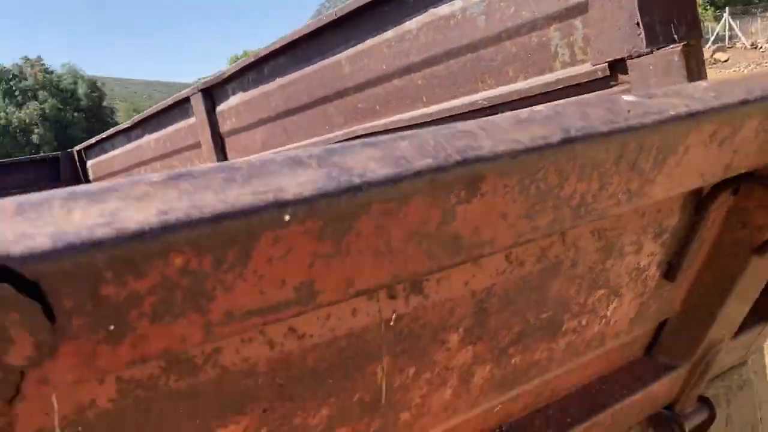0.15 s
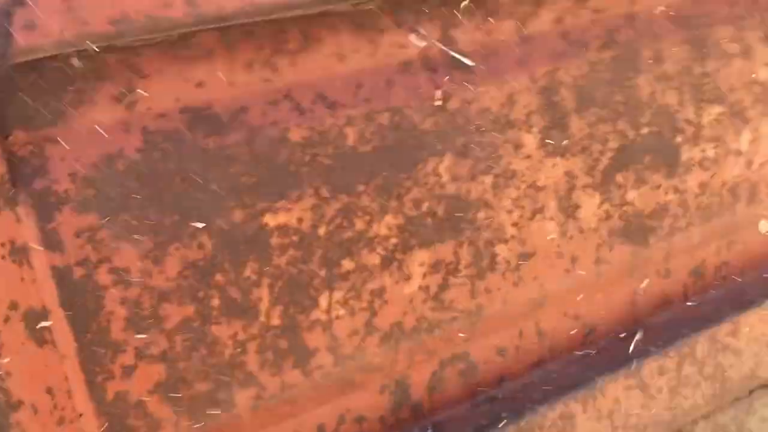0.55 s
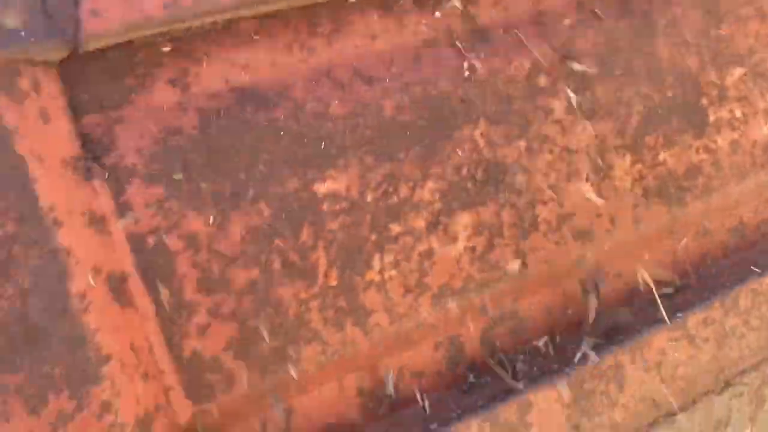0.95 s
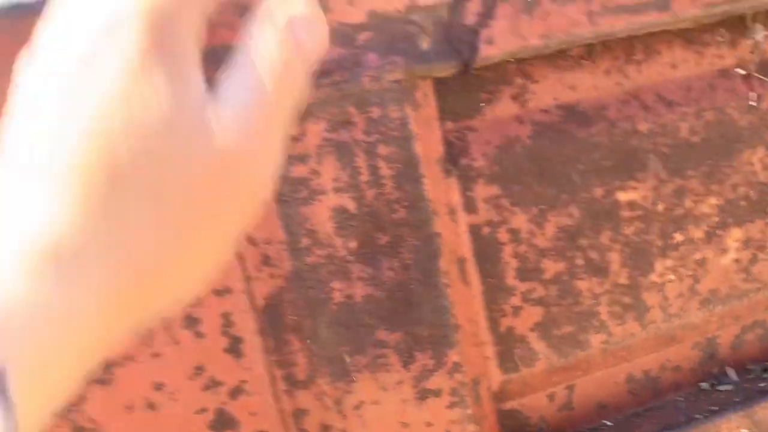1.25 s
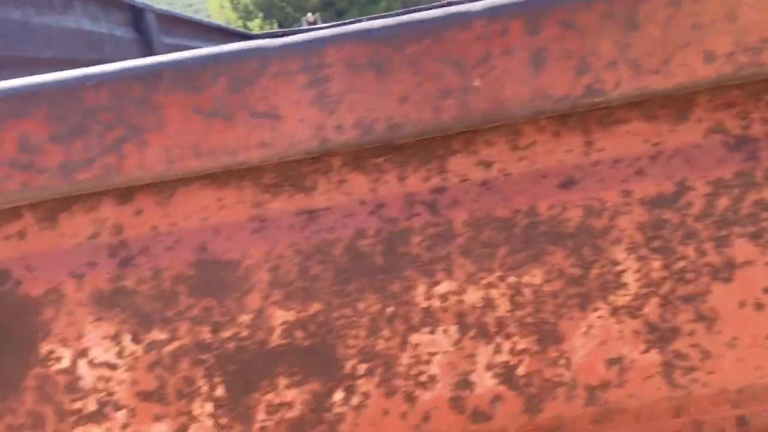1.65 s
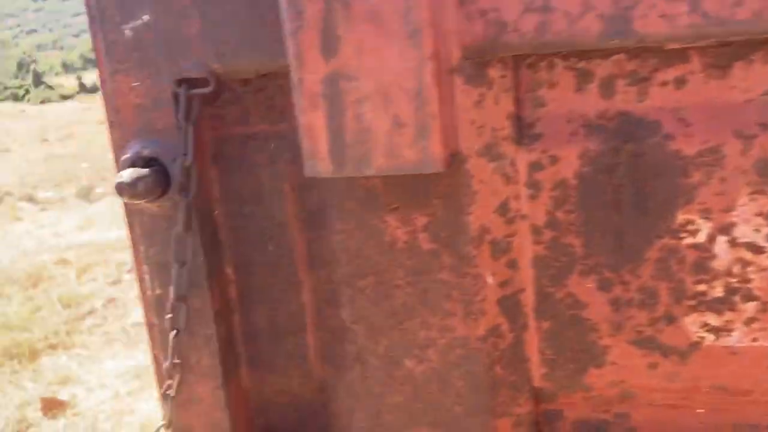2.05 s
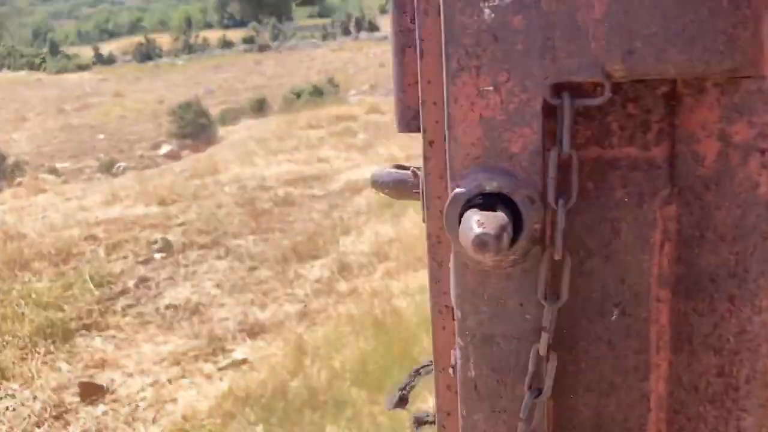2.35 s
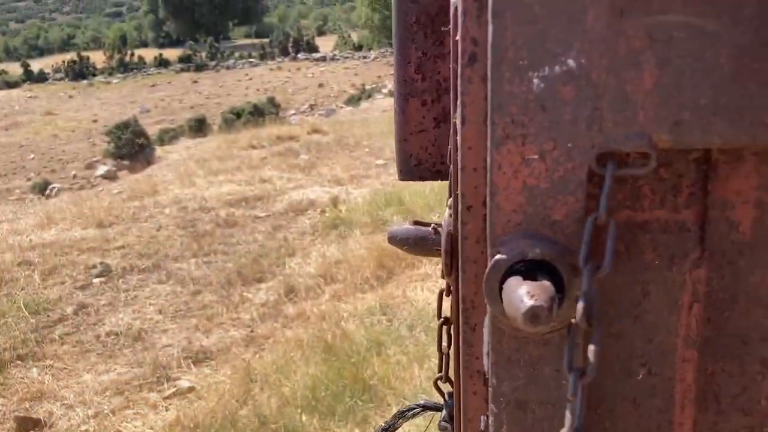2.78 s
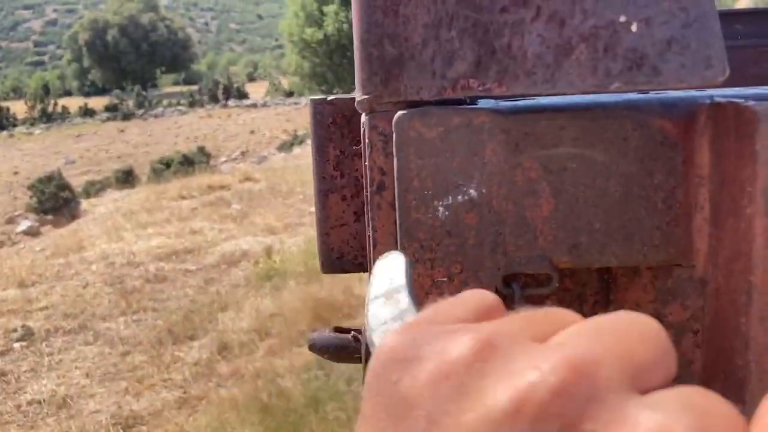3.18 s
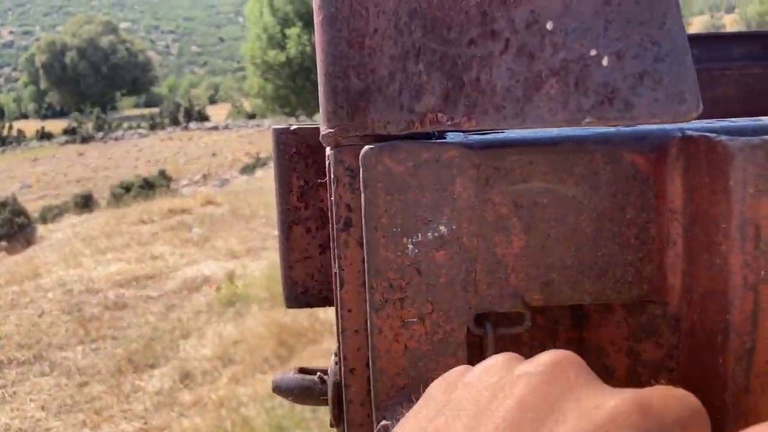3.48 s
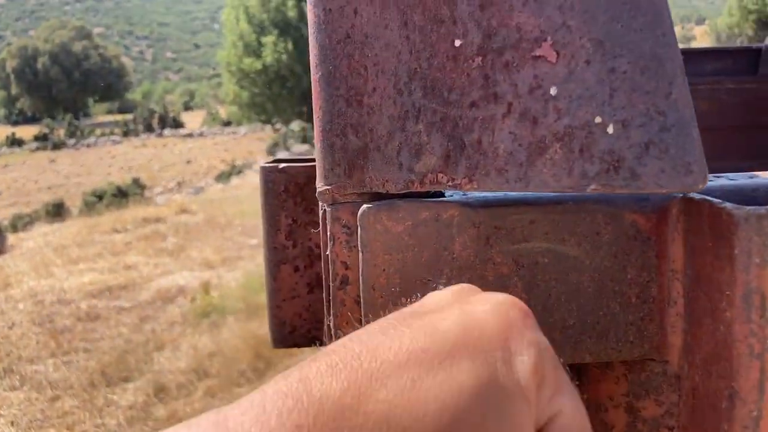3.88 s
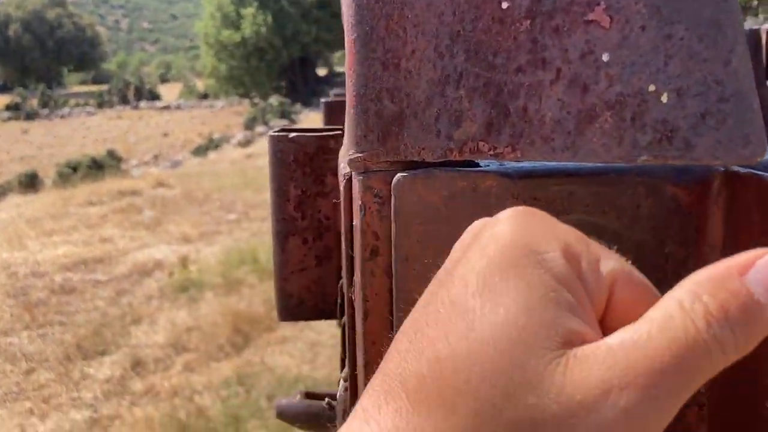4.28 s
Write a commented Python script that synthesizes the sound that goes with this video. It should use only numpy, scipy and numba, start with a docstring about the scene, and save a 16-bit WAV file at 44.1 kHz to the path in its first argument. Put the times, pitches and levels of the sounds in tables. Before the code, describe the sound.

Close, stereo phone pickup outdoors, no room echo. Throughout, a three-cylinder diesel idles at about sixteen soft, deep thumps a second, with slight exhaust resonance over a faint low wash; it eases a little after 2 s. From 0 to 0.5 s a loose steel gate rumbles with light clinks, gritty scraping and a dull thud at 0.27. At 0.55-0.7 it slams: the loudest, dense, clanging sheet-metal crash with low boom and spraying rust grit. Until about 1.25 clattering knocks and rattles follow, peaking near 0.92 and 1.08, over a wavering low hum of the sheet that fades by 2.1. A hard bright clank hits at 1.63. Crisp chain and pin clinks come around 2.0, 2.26 and 2.33, a finger tick on the phone at 2.17, then tiny high tinkles at 2.8-2.97. A ringing latch clack falls at 3.5, another phone tick at 3.94, a last small clink at 4.09.

```python
"""Outdoors behind a steel trailer, near a hand-held phone: a three-cylinder diesel idles, each firing
a thump that rings exhaust and block, over a distant noise wash.
The tailgate rumbles, slams shut and sheds grit: blows and shaped noise ring its sheet modes.
Latch, chain and pin clink as struck steel modes plus rattling noise; the sheet hums on one slow mode.
A finger knocks twice on the phone: ticks that fall in pitch."""
import sys
import numpy as np
from scipy import signal
from scipy.fft import rfft, irfft
from scipy.io import wavfile
from scipy.ndimage import uniform_filter1d
from numba import njit

SR = 44100
rng = np.random.default_rng(int(sys.argv[2]) if len(sys.argv) > 2 else 0)


def undo_db(level):
    """Turn decibels back into plain size, where 20 dB means ten times bigger."""
    steps = np.asarray(level, float) / 20
    return 10 ** steps


def wrap_up_sound(samples):
    """Save the sound to the file named by the first command line argument, as 16-bit audio."""
    columns = np.atleast_2d(samples).T
    # keep every value between -1 and 1, then stretch to whole-number steps
    tamed = np.clip(columns, -1, 1)
    steps = np.round(tamed * 32767).astype(np.int16)
    wavfile.write(sys.argv[1], SR, steps)


N = 194948
T = np.arange(N) / SR

# gate sheet modes: (frequency [Hz], relative level [dB], t60 [s])
GATE_MODES = [(110, -2, .15), (160, -3, .12), (210, 0, .15), (285, 2, .15), (307, 0, .7), (369, 2, .22),
              (410, -4, .35), (486, -2, .22), (576, -6, .4), (635, -6, .25), (727, -2, .12), (788, 0, .18),
              (838, 2, .15), (885, 0, .12), (940, 0, .18), (996, 0, .2), (1098, 0, .1), (1168, 0, .1),
              (1240, 0, .11), (1320, -2, .1), (1400, -2, .08), (1663, -1, .3), (1860, -3, .22),
              (1950, -2, .14), (2090, -2, .08), (2290, 0, .08), (2430, -4, .05), (2630, -7, .06),
              (2980, -11, .04), (3300, -12, .04), (3600, -12, .04)]
# blows on the gate sheet: (time [s], relative level [dB], loudest ring [Hz])
SHEET_BLOWS = [(.002, -34, 790), (.2, -24, 490), (0.269, -6, 170), (.539, -25, 2290), (0.553, -19, 1100),
               (0.556, -15.5, 369), (0.579, -14, 310), (0.597, -13.5, 277.5), (0.58, -14, 1137),
               (.584, -10, 3300), (.597, -10.5, 2090), (.612, -15.5, 1800), (0.679, -24, 2430),
               (0.611, -11, 380), (.63, -20, 720), (0.597, -13, 110), (.6, -17, 1210), (.76, -28, 310),
               (0.95, -27, 1240), (1.0, -33.5, 410), (1.169, -28, 1990), (1.199, -44, 560),
               (1.633, -14.5, 824), (1.641, -13, 940), (1.632, -11, 2400), (1.632, -13.5, 2980),
               (1.644, -21.5, 1950), (1.678, -15.5, 3600), (1.636, -18, 1250), (1.635, -22, 1663),
               (1.636, -30, 380), (1.75, -43, 1860), (1.69, -30, 960), (1.175, -30, 1168), (.97, -30, 410),
               (2.052, -40, 860), (2.053, -40, 1240), (2.065, -44, 390), (2.335, -37, 1200),
               (3.498, -42, 1784), (3.499, -42, 1200), (4.092, -37, 1330)]
# steel on steel: (time [s], relative level [dB], loudest ring [Hz], ring over blow [dB],
# nominal rattle t60 [s])
CLINKS = [(0.1036, -34.5, 7260, -18, 0.13), (0.173, -23, 7700, -11, 0.098),
          (0.2442, -40.5, 3360, -29, 0.032), (0.264, -36.5, 3620, -8, 0.17),
          (0.418, -30.5, 5100, -23, 0.026), (0.5372, -11.5, 7200, -24, 0.094),
          (0.5784, 0.5, 5000, -32, 0.26), (0.6464, -2.5, 10600, -43, 0.12),
          (0.6774, 1.5, 11200, -22, 0.041), (0.815, -26, 11200, -31.5, 0.18), (.868, -30, 7840, -11, 0.12),
          (0.903, -19.5, 3175, -13, 0.03), (0.9187, -5, 12300, -24, 0.078), (0.9474, -4.5, 4460, -10, 0.09),
          (1.0217, -18, 5000, -15, 0.19), (1.074, -9.5, 10100, -40, 0.081), (1.087, -8.5, 7800, -25, 0.065),
          (1.096, -13.5, 7800, -25, 0.048), (1.1322, -19.5, 11300, -19, 0.12),
          (1.1522, -7.5, 11700, -37, 0.051), (1.1681, -30.5, 3100, -13, 0.11),
          (1.1886, -41, 3165, -1, 0.083), (1.208, -48, 3175, 3.5, .06), (1.228, -49.5, 3175, 1, .06),
          (1.211, -42.5, 6200, -1.5, .1), (1.3134, -26, 11100, -26, 0.073),
          (1.365, -35.5, 12600, -16, 0.11), (1.5157, -42, 6100, -9.5, 0.13), (1.6165, -20, 7800, -10, 0.15),
          (1.63, -2, 8305, -6.5, 0.13), (1.6763, -17.5, 3560, -13, 0.054), (1.9829, -18, 11410, -19, 0.12),
          (1.9957, -10.5, 11300, -14.5, 0.05), (2.0133, -19, 11200, -27, 0.11),
          (2.0521, -9, 6154, -15, 0.095), (2.1216, -24, 5100, -16, 0.087), (2.208, -30.5, 7400, -22, 0.06),
          (2.222, -33.5, 7800, -19, 0.071), (2.2483, -27.5, 7790, -22, 0.045),
          (2.258, -12.5, 11610, -5.5, 0.12), (2.277, -24.5, 3900, -16, 0.037),
          (2.3296, -9.5, 6070, -24, 0.065), (2.391, -18.5, 6240, -35, 0.071), (2.608, -39, 9407, -2, 0.052),
          (2.788, -38.5, 3170, -2.5, 0.02), (2.79, -43, 6114, -11.5, 0.049), (2.812, -39.5, 8790, 4, 0.049),
          (2.8054, -46, 3170, 6, 0.033), (2.823, -37.5, 12900, -15, 0.045),
          (2.8364, -32, 11350, -21, 0.052), (2.85, -45.5, 14200, 9, .06), (2.865, -40.5, 14070, 11, 0.059),
          (2.859, -51, 4430, -8, 0.08), (2.872, -51, 4430, -11, .06), (2.885, -36, 14260, 0, 0.2),
          (2.909, -34, 14200, -1, 0.11), (2.9221, -25.5, 14000, -2, 0.14), (2.941, -22.5, 7760, -17, 0.084),
          (2.968, -27.5, 3900, -5, 0.048), (3.084, -56, 3154, -4, 0.04), (3.098, -56, 3140, 3.5, .04),
          (3.1488, -28.5, 6270, -9.5, 0.0079), (3.1642, -38, 9400, -26, 0.043),
          (3.217, -55, 11070, -26.5, 0.018), (3.266, -42.5, 7660, -17.5, 0.035),
          (3.33, -54, 13940, -8.5, 0.054), (3.358, -47.5, 14040, -12.5, 0.021),
          (3.462, -51.5, 6060, -2.5, 0.039), (3.479, -31.5, 6127, -19, 0.018),
          (3.4954, -14, 11730, -6, 0.12), (3.498, -27, 5750, -0.5, .06), (3.5, -24.5, 6120, 4, 0.046),
          (3.5056, -15.5, 4374, -15, 0.089), (3.51, -26, 6700, 13, 0.046), (3.529, -22, 5100, -2.5, 0.043),
          (3.5875, -23, 7400, -31, 0.057), (3.6229, -37, 4240, -22, 0.2), (3.6575, -33, 3480, -17, 0.032),
          (3.669, -29, 4280, -15, 0.057), (3.706, -45.5, 14030, -9, 0.055), (3.7399, -46, 11600, -27, .025),
          (3.7985, -34, 4230, -12, 0.045), (3.953, -47, 11200, -24.5, .015),
          (4.0647, -30.5, 3300, -25, 0.19), (4.0866, -17, 14020, -13, 0.088), (4.1, -44.5, 6700, 19.5, .06),
          (4.09, -20, 3410, -6, .045), (4.093, -29, 11440, -4.5, 0.057), (4.093, -28, 6100, -5, 0.042),
          (4.19, -43.5, 4800, -11.5, 0.069)]
LOW_MODES_HZ = 600  # below it the whole panel moves


def noise():
    """White noise, unit variance."""
    return rng.standard_normal(N)


def level(x, rms_db):
    """Sets the rms level."""
    return x * undo_db(rms_db) / np.sqrt(np.mean(x ** 2))


def band(x, lo_hz, hi_hz):
    """Second-order Butterworth band-pass."""
    return signal.sosfilt(signal.butter(2, [lo_hz, hi_hz], "bandpass", fs=SR, output="sos"), x)


def ring(x, hz, t60_s):
    """One damped mode: two-pole resonator, about unit peak for a unit impulse."""
    radius = 1000 ** (-1 / (t60_s * SR))
    w = 2 * np.pi * hz / SR
    return signal.lfilter([0, np.sin(w)], [1, -2 * radius * np.cos(w), radius * radius], x)


def walk(rate_per_s):
    """Random levels held 1 / rate, smoothed twice over the same span."""
    hold = int(SR / rate_per_s)
    steps = np.repeat(rng.standard_normal(N // hold + 1), hold)
    return uniform_filter1d(uniform_filter1d(steps, hold), hold)[:N]


def chirp(start_hz, end_hz, glide_s, rise_s, power):
    """Short swell whose pitch slides exponentially from start to end."""
    t = np.arange(int(.12 * SR)) / SR
    hz = end_hz + (start_hz - end_hz) * np.exp(-t / glide_s)
    swell = (t / rise_s * np.exp(1 - t / rise_s)) ** power
    return swell * np.sin(2 * np.pi * np.cumsum(hz) / SR)


def blows(times_s, sizes):
    """One impulse per blow."""
    out = np.zeros(N)
    np.add.at(out, np.clip((np.asarray(times_s) * SR).astype(int), 0, N - 1), sizes)
    return out


def strike(modes, times_s, db, share_db):
    """Impulses ring a set of modes; share_db[mode, blow], with random level and sign per pair."""
    chance = rng.standard_normal((len(times_s), len(modes))).T
    out = 0
    for (hz, mode_db, t60_s), share, scatter in zip(modes, share_db, chance):
        sizes = np.sign(scatter) * undo_db(db + mode_db + share + 2.0 * scatter)
        out = out + ring(blows(times_s, sizes), hz, t60_s)
    return out


def fading(start_s, db, t60_s):
    """Power of a shake that starts at once and dies exponentially, cut after 0.5 s."""
    out, start = np.zeros(N), int(np.ceil(start_s * SR))
    span = slice(start, start + SR // 2)
    out[span] = undo_db(db - 60 * (T[span] - start_s) / max(t60_s, .008)) ** 2
    return out


def engine():
    """Each firing leaves the pipe as a thump, lows last, and rings the pipe and block."""
    firing_hz, first_firing_s = 16.058, .0053
    # cylinders in firing order: (relative level [dB], lateness [s])
    cylinders = [(-.5, 0), (0, -.0006), (-1.8, .0007)]
    # exhaust and block resonances re thump: (frequency [Hz], width [Hz], level [dB])
    exhaust = [(203.6, 10, -24), (254.1, 15, -24.5), (329.5, 16, -28), (412.4, 39, -29.5), (446, 22, -32)]
    # thump as the phone moves along the trailer: (time [s], level [dB])
    engine_level = [(0, -29.5), (.5, -29.5), (1.3, -30), (2.4, -32), (4.42, -31.5)]
    k = np.arange(int(N / SR * firing_hz) + 1)
    jitter, scatter = rng.standard_normal((len(k), 2)).T
    db, late_s = np.array(cylinders)[k % 3].T
    times_s = first_firing_s + k / firing_hz + late_s + 0.000068 * jitter
    firing = blows(times_s, undo_db(db + .5 * scatter))
    thump = np.convolve(firing, chirp(156.5, 17.0, 0.022, 0.014, 3.3))[:N]
    # the trailer side sends it back later and weaker
    echo = undo_db(-12.5) * np.roll(thump, int(.029 * SR))
    rough = firing * 40 + .5 * noise()
    pipe = sum(level(band(rough, hz - w / 2, hz + w / 2), db) for hz, w, db in exhaust)
    return (level(thump + echo, 0) + pipe) * undo_db(np.interp(T, *np.transpose(engine_level)))


def field():
    """Engine wash and open field: spectrally shaped noise that swells a little."""
    # spectrum shape: (frequency [Hz], relative level [dB])
    spectrum = [(20, -14), (45, -10), (90, -10.5), (150, -5), (300, -6.5), (470, -16.5), (650, -22),
                (1000, -17.5), (1500, -27), (2800, -35), (5000, -44), (16000, -46)]
    hz, db = np.transpose(spectrum)
    f = np.maximum(np.arange(N // 2 + 1) * SR / N, 1)
    wash = irfft(rfft(noise()) * undo_db(np.interp(np.log(f), np.log(hz), db)), N)
    return level(wash, -50.5) * undo_db(0.99 * walk(4.4))


def shaking():
    """Amplitudes of panel, bed boom and grit as the gate swings, slams and settles."""
    # (time [s], panel [dB], trailer bed boom [dB], grit [dB])
    shake = [(0, -31.5, -32, -39), (0.121, -43, -35.5, -69), (0.202, -39.5, -27, -44),
             (0.271, -44.5, -28.5, -72.5), (0.359, -44.5, -36.5, -49.5), (0.519, -54, -37, -59.5),
             (.55, -21.5, -29, -67.5), (.6, -9.5, -24.5, -40), (0.638, -15.5, -11.5, -34.5),
             (0.717, -23.5, -34, -54), (.78, -31.5, -39, -52), (0.902, -32.5, -28.5, -31),
             (1.02, -27, -29.5, -41), (1.09, -38, -39.5, -66), (1.23, -39, -33.5, -54.5),
             (1.42, -59, -43.5, -60), (1.902, -53, -71, -59.5), (2.62, -56.5, -77.5, -59.5)]
    s, *columns = np.transpose(shake)
    return [undo_db(np.interp(T, s, db, right=-120)) for db in columns]


def contact_powers(panel, grit):
    """Noise powers that shaking, clinks and blows feed to small parts and sheet."""
    rattle, sizzle = grit ** 2, (grit * undo_db(-5.0)) ** 2
    knock, rumble = (panel * undo_db(-14)) ** 2, panel ** 2
    swing_ends_s, swinging_db, shut_db = .66, -22.5, -32  # clink into gate, loose and shut
    for t, db, ring_hz, _, t60_s in CLINKS:
        bright_db = 4.4 * np.log2(ring_hz / 7000)
        # small parts are bright and stop first; the heavy sheet shakes longest
        sizzle = sizzle + fading(t, db - 14.5 + bright_db, 0.67 * t60_s)
        rattle = rattle + fading(t, db - 12 - bright_db, 1.53 * t60_s)
        gate_db = swinging_db if t < swing_ends_s else shut_db
        knock = knock + fading(t, db + gate_db, 2.05 * t60_s)
        knock = knock + fading(t, db - 41.5, 0.32)  # faint after-hum of the sheet
    for t, db, ring_hz in SHEET_BLOWS:
        shudder = fading(t, db - 20.5, 0.26)
        rumble = rumble + shudder * undo_db(-3.5)
        knock = knock + shudder * (ring_hz > LOW_MODES_HZ)
    # contact is spread over 2 ms
    rattle, sizzle, knock = (uniform_filter1d(e, size=90) for e in (rattle, sizzle, knock))
    # unsmoothed crack of the first touch
    crack = sum(fading(t, db - 9, .008) for t, db, *_ in CLINKS)
    return rattle + crack, sizzle + crack, knock, rumble


def grit_hiss(grains, rattle, sizzle):
    """Rust flakes and chatter: uneven grains in a middle and a treble band."""
    middle = level(band(grains, 1923, 7970), 0) * np.sqrt(np.abs(rattle))
    treble = level(band(band(grains, 5580, 13500), 5400, 11880), 0)
    return middle + treble * np.sqrt(np.abs(sizzle))


def shaken_sheet(grains, knock, rumble):
    """Noise forces ring the gate modes and are also heard directly in two bands."""
    low, high = noise() * np.sqrt(rumble), grains * np.sqrt(np.abs(knock))
    modes = 0
    for hz, db, t60_s in GATE_MODES:
        push = low if hz < LOW_MODES_HZ else high
        # long ringers take up less of a noisy push
        modes = modes + undo_db(db) / t60_s * ring(push, hz, t60_s)
    direct = undo_db(15.0) * band(low, 110, 520) + undo_db(14.5) * band(high, 780, 2800)
    return undo_db(-51.0) * modes + direct


def sheet_blows():
    """Impulses on the sheet; modes far from a blow's pitch get little of it."""
    s, db, ring_hz = np.transpose(SHEET_BLOWS)
    octaves = np.abs(np.log2(np.array(GATE_MODES)[:, :1] / ring_hz))
    rung = strike(GATE_MODES, s, db, np.maximum(-55 * octaves, -40))
    return rung * undo_db(3 * walk(150))  # uneven ring


def links():
    """The struck part rings, its mode nearest the blow's pitch most; the other parts barely."""
    # hook, pin, chain links, hinge, latch bar, pin ring; one list a part:
    # (frequency [Hz], relative level [dB], free t60 [s])
    parts = [
        [(3175, 4, .14), (9450, -2, .09)],
        [(3430, -4, .09), (6121, 0, .12), (12835, -13, .2)],
        [(3900, -4, .045), (5100, -4, .06), (7800, 3, .05), (11350, 4, .07)],
        [(4230, 0, .04), (4430, 3, .055), (4700, 3, .045), (5017, 3, .07), (5750, -8, .04)],
        [(8794, 0, .09), (9432, -6, .13), (11880, -10, .05), (12760, -16, .2)],
        [(6700, -21, .2), (14230, 0, .1)],
    ]
    held_below_s, held_share = .05, .3  # a short rattle means a held part: its ring is cut to this share
    s, db, ring_hz, ring_db, t60_s = np.transpose(CLINKS)
    modes = sum(parts, [])
    hz = np.array(modes)[:, :1]
    part = np.repeat(np.arange(len(parts)), [len(p) for p in parts])[:, None]
    nearest = np.abs(np.log(hz / ring_hz)).argmin(axis=0)
    share_db = np.where(part == part[nearest, 0], -3.0, -27.0)
    share_db[nearest, np.arange(len(s))] = 0
    held = t60_s < held_below_s
    damped = [(f, mode_db, held_share * t) for f, mode_db, t in modes]
    rung = 0
    for mode_set, k in ((modes, ~held), (damped, held)):
        rung = rung + strike(mode_set, s[k], (db + ring_db)[k], share_db[:, k])
    # loose parts keep touching, so their ring is rough
    return rung * undo_db(3 * walk(400))


def bed_boom(boom):
    """Trailer bed: low noise band following the boom amplitude."""
    return level(band(band(noise(), 55, 190), 55, 190), 0) * boom


def gate_and_chain():
    """Shaking, blows and clinks drive grit, sheet, links and bed together."""
    panel, boom, grit = shaking()
    rattle, sizzle, knock, rumble = contact_powers(panel, grit)
    grains = noise() * undo_db(3.5 * walk(400) + 2.0 * walk(90))
    hiss = grit_hiss(grains, rattle, sizzle)
    sheet = shaken_sheet(grains, knock, rumble) + sheet_blows()
    return links() + hiss + sheet + bed_boom(boom)


def panel_hum():
    """Slow sheet mode, wavering slightly, fed by the rattling, then ringing until a hand stills it."""
    # (time [s], rms level [dB])
    hum_level = [(0.599, -51), (.68, -33.5), (.79, -44), (.86, -34), (1.02, -31), (1.099, -40),
                 (1.15, -33.5), (1.6, -43.5), (2.02, -47.5), (2.15, -61.5)]
    s, db = np.transpose(hum_level)
    hz = 224.4 * (1 + .003 * walk(8))
    envelope = np.sqrt(2) * undo_db(np.interp(T, s, db, left=-120, right=-120))
    return envelope * np.sin(2 * np.pi * np.cumsum(hz) / SR)


def knocks():
    """Finger on the phone: a tick that falls in pitch through the phone's body."""
    # (time [s], relative level [dB], starting pitch [Hz])
    finger = [(2.168, -29, 1200), (3.9351, -24.5, 3570)]
    ticks = np.zeros(N)
    for s, db, hz in finger:
        ticks += np.convolve(blows([s], undo_db(db)), chirp(hz, 505.0, 0.0006, 0.0017, 2.6))[:N]
    return band(ticks, 500, 6000)


def scene():
    """All sources as the phone's two microphone ports hear them."""
    # ports: (frequency [Hz], left lead [rad], share of unlike sound [0-1])
    ports = [(0, 0, 0), (90, -.12, .003), (300, .05, .003), (420, .15, .01), (700, .8, .17),
             (1300, 1.3, .35), (2600, .9, .35), (4400, .8, .3), (5200, 2.4, .35), (6800, 0, .1),
             (16000, -12.56, .12)]
    # microphone: (frequency [Hz], colour [dB], left over right [dB])
    mic = [(100, 0, 0), (297, 0, 2), (700, 1, 2.5), (1380, 0, 2.5), (3000, -1, 1), (8100, 1, 1),
           (12100, -1, 0.5), (13600, 2, 0), (14880, 0.5, -0.5), (16500, -7, -1)]
    # balance as the phone turns along the trailer: (time [s], left over right [dB])
    pan = [(0, 0), (.7, 0), (1.7, -0.14), (2.4, 0.5), (4.42, -0.5)]
    sides = np.array([[.5], [-.5]])
    f = np.arange(N // 2 + 1) * SR / N
    hz, lead_rad, unlike = np.transpose(ports)
    turn, share = np.exp(.5j * np.interp(f, hz, lead_rad)), np.interp(f, hz, unlike)
    alike = rfft(engine() + panel_hum() + field() + gate_and_chain()) * np.sqrt(1 - share)
    # other parts of the wide sheet and field reach the ports out of step
    apart = rfft(field() + gate_and_chain()) * np.sqrt(share)
    mic_hz, colour_db, tilt_db = np.transpose(mic)
    colour = undo_db(np.interp(f, mic_hz, colour_db) + np.interp(f, mic_hz, tilt_db) * sides)
    air = irfft(colour * np.array([alike * turn + apart, alike / turn - apart]), N)
    air = air * undo_db(np.interp(T, *np.transpose(pan)) * sides)
    tick = knocks()
    return air + np.array([np.roll(tick, shift=6), tick])  # left 6 samples late


@njit
def gain_control(x, top, ratio, attack, release):
    """Follows the level and turns down what exceeds top; attack and release are per-sample rates."""
    gain, e = np.ones(len(x)), 0.
    for i in range(len(x)):
        e += (x[i] - e) * (attack if x[i] > e else release)
        gain[i] = (top / max(e, top)) ** (1 - 1 / ratio)
    return gain


def top_cut(x):
    """Nothing passes above the cut-off."""
    return signal.sosfilt(signal.butter(12, 16810, fs=SR, output="sos"), x)


def record(dry):
    """The phone drops the deepest bass and the top, ducks after loud blows and soft-clips."""
    x = signal.sosfilt(signal.butter(2, 39, "highpass", fs=SR, output="sos"), dry)
    x = signal.sosfilt(signal.butter(8, 16300, fs=SR, output="sos"), x)
    attack_s, release_s = 0.062, .13
    loudest = np.abs(x).max(axis=0)
    x = x * gain_control(loudest, undo_db(-24.0), 1.274, 1 / (attack_s * SR), 1 / (release_s * SR))
    x = .95 * np.tanh(x / .95)
    return top_cut(x)


dry = scene()
out = record(dry)
wrap_up_sound(out)
```